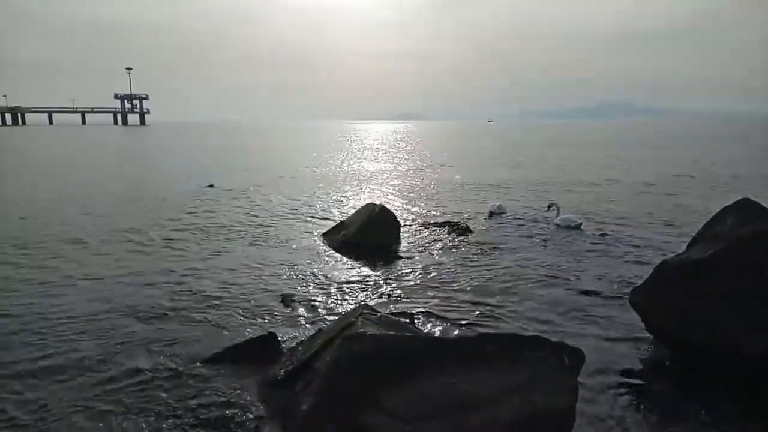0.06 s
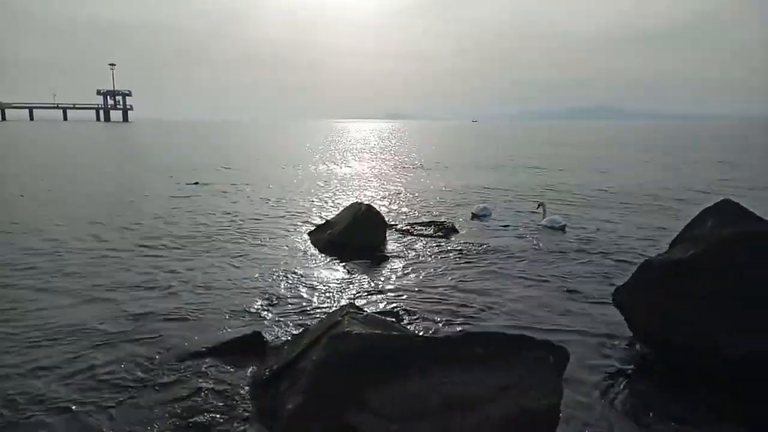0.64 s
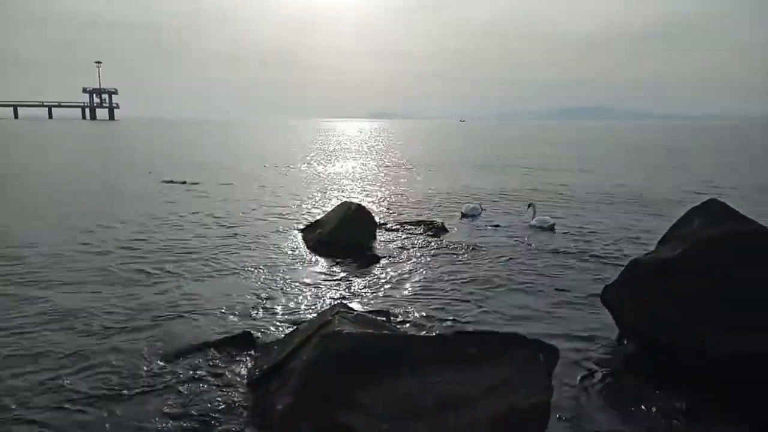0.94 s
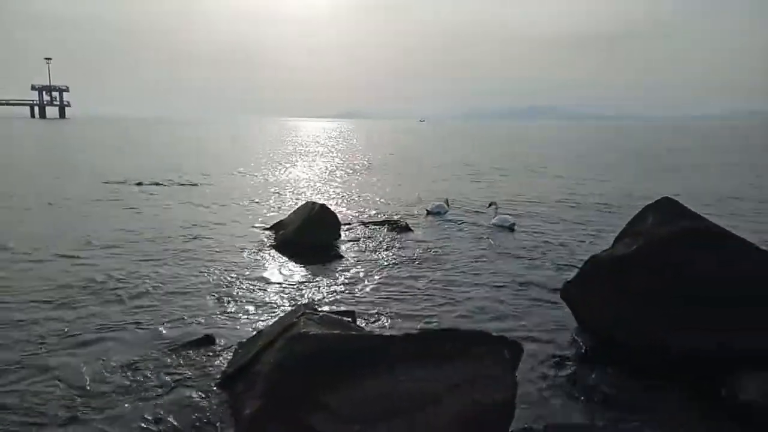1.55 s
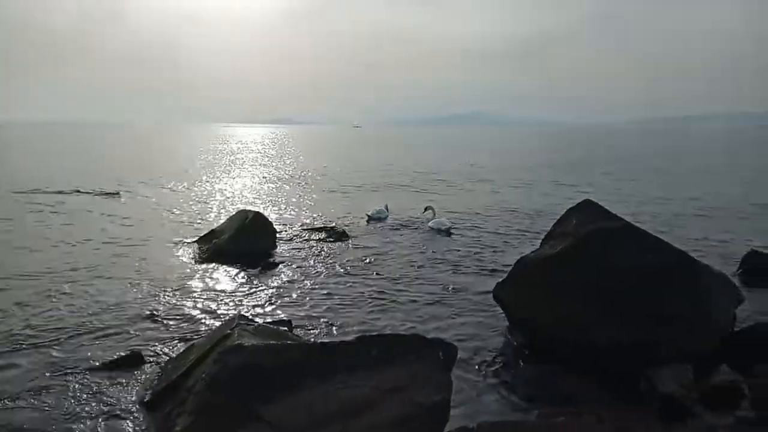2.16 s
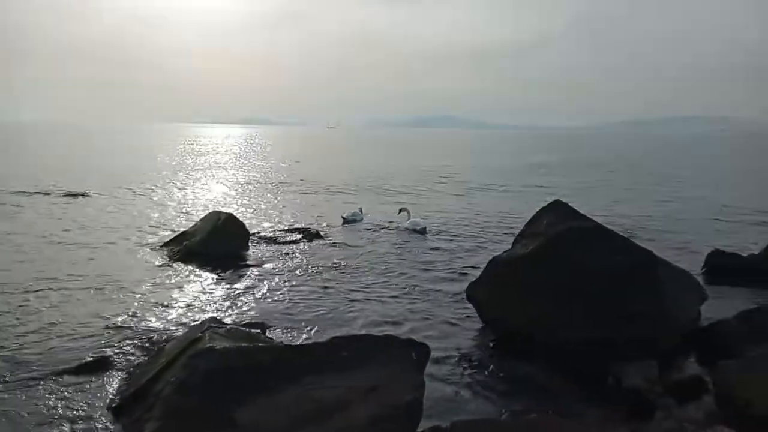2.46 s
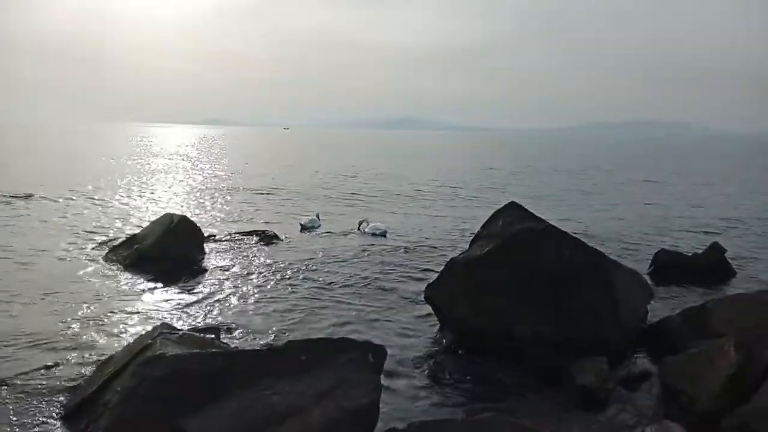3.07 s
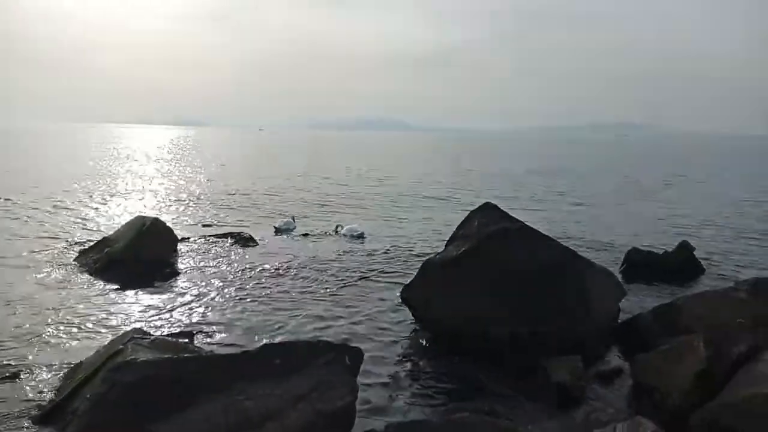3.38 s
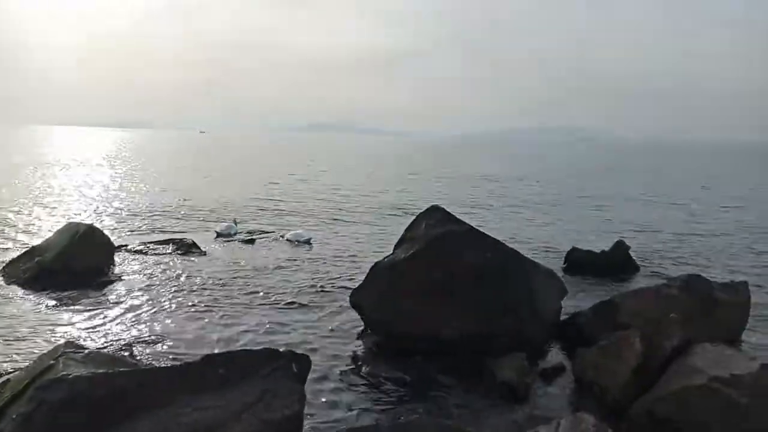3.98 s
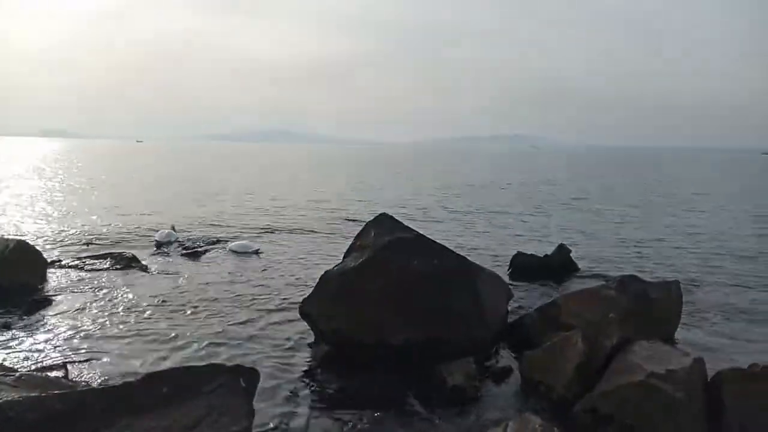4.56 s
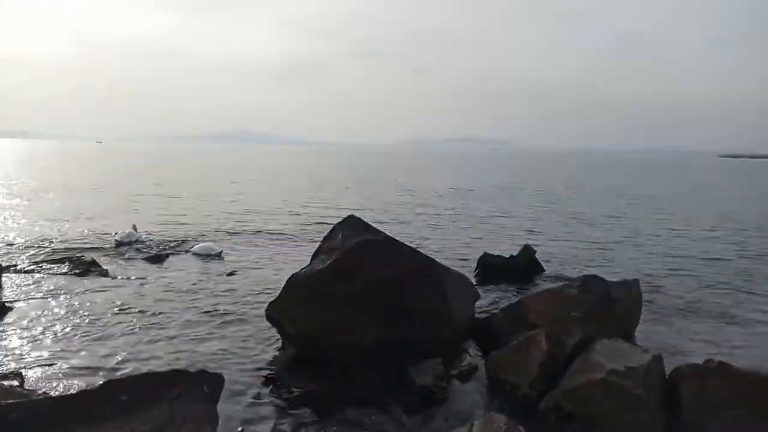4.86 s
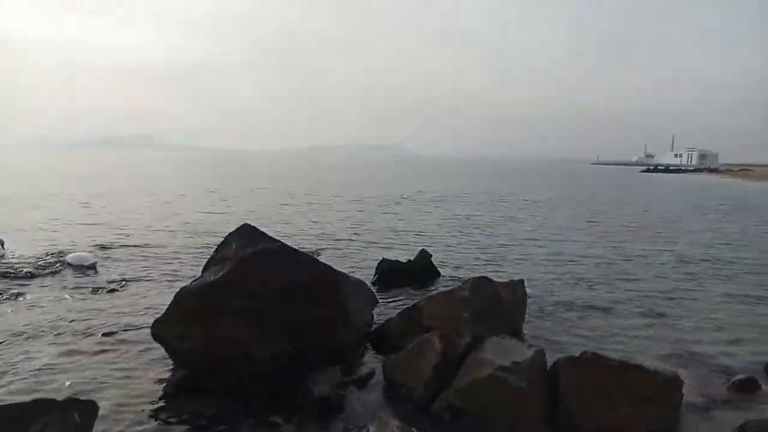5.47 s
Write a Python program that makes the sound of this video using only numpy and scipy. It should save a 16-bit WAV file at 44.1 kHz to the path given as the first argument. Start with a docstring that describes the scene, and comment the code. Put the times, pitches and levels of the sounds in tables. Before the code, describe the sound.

Gentle waves lap, gurgle and splash among shore rocks while a breeze rumbles on the microphone, easing halfway through.

```python
"""Small waves lap among shore rocks while a breeze buffets the microphone, mostly its right port.
Each wave sloshes, gurgles and fizzes as swarms of bubbles ring. Single air pockets plop, spray ticks,
drops fall, mist patters and a swell roars low in a hollow; the boulders return short echoes.
The wind's eddies rumble and flutter, easing halfway through, over a faint hiss.
The left port faces away from the water and hears it late and muffled."""
import sys
import numpy as np
from scipy import signal
from scipy.fft import rfft, irfft, next_fast_len
from scipy.io import wavfile
from scipy.ndimage import uniform_filter1d, map_coordinates

SR = 44100
rng = np.random.default_rng(int(sys.argv[2]) if len(sys.argv) > 2 else 0)


def materialize(psi):
    """Save the field psi as 16-bit PCM at rate SR to the path in sys.argv[1].

    A 1-D psi becomes a single channel; in a 2-D psi each row is a channel.
    """
    bounded = np.clip(np.atleast_2d(psi).T, -1, 1)
    quanta = np.round(bounded * 32767).astype(np.int16)
    wavfile.write(sys.argv[1], SR, quanta)


N = 248283

# Waves reaching the rocks. Each row: crest in seconds, gurgle level in dB, rise and fall in seconds
# per 20 dB, slosh and foam in dB against the gurgle.
LAPS = [(0.01, -45.5, 0.22, .25, -13, -10.5), (0.12, -53, 0.3, .3, 1.5, -0.5),
        (0.48, -51.5, 1, 0.66, -2, -4.5), (0.68, -55, 0.56, 0.28, 3, -1), (1.43, -49.5, 0.71, 0.37, -7, -7),
        (1.66, -49.5, 0.33, 0.21, -5, -4), (2.02, -47, 0.75, .27, -12.5, -3.5),
        (2.17, -57, 0.25, 0.12, 2, -1), (2.72, -58, 0.85, 1, -7, -7.5), (3.33, -55, 0.61, 0.97, 2.5, -4),
        (3.64, -50.5, .45, 0.52, -1, -4), (3.87, -58, 0.12, 0.46, -4, 1.5),
        (4.24, -50, 0.17, 0.57, -12, -3), (4.56, -49.5, 0.78, 0.67, -24, -3.5), (4.85, -44, 1, 1, -12, -5),
        (5.24, -55.5, 0.17, 0.7, -7, -2), (5.58, -44.5, 0.77, 0.63, -8, -3.5)]
def lapping():
    """Level curves of the slosh, gurgle and foam that the waves stir up."""
    crest_s, db, rise_s, fall_s, slosh_offset_db, foam_offset_db = np.transpose(LAPS)
    foam_lag_s = 0.004
    slosh_db = swells(crest_s, db + slosh_offset_db, rise_s, fall_s, calm_db=-61)
    gurgle_db = swells(crest_s, db, rise_s, fall_s, calm_db=-57.5)
    foam_db = swells(crest_s + foam_lag_s, db + foam_offset_db, rise_s, fall_s, calm_db=-80)
    return slosh_db, gurgle_db, foam_db


# Spectra of the three water layers. Each row: frequency in Hz, gain in dB.
SLOSH_EQ = [(120, -23), (300, -3), (450, -6), (750, -4), (1050, -7), (1500, -12.5), (3000, -47)]
GURGLE_EQ = [(500, -48), (900, -6), (1400, -3), (1900, 2), (2600, 1.5), (3100, -5.5), (4100, -55),
             (9000, -60)]
FOAM_EQ = [(1500, -40), (2700, -2), (3800, 2.5), (5200, 1), (6300, -2.5), (7100, -4.5), (10000, -4.5),
           (16000, -10)]
def waves(slosh_db, gurgle_db, foam_db):
    """Each wave sloshes between the rocks, gurgles with trapped air and leaves fizzing foam."""
    big = swarm(per_s=260, low_hz=323.3, high_hz=1205, cycles=15.2, spread_db=1.0, samples=2000)
    medium = swarm(per_s=1100, low_hz=966, high_hz=3224, cycles=44.5, spread_db=2.5, samples=1100)
    tiny = swarm(per_s=2400, low_hz=2996, high_hz=8720, cycles=65, spread_db=4.0, samples=500)
    slosh = amp(slosh_db + 7) * churn(big, SLOSH_EQ, rush_db=8.0, restless_db=2)
    gurgle = amp(gurgle_db + 3.5) * churn(medium, GURGLE_EQ, rush_db=7, restless_db=1.7)
    foam = amp(foam_db + 1.5) * churn(tiny, FOAM_EQ, rush_db=2.0, restless_db=1.43)
    return slosh + gurgle + foam


def swarm(per_s, low_hz, high_hz, cycles, spread_db, samples):
    """Many bubbles at random moments, mostly faint and a few loud, at rms 1."""
    when, pitch, life, strength = rng.random((int(per_s * N / SR), 4)).T[..., None]
    hz = low_hz * (high_hz / low_hz) ** pitch
    rings = bubble(np.arange(samples) / SR, hz, t60_s=cycles * (.5 + life) / hz, rise=0.19)
    rings = rings * amp(-spread_db * np.log(np.maximum(strength, .015)))
    index = (when * N).astype(int) + np.arange(samples)
    return unit(np.bincount(index.ravel(), rings.ravel(), N)[:N])


def bubble(t, hz, t60_s, rise):
    """A pinched-off bubble swells within a cycle, rings down and rises in pitch near the surface."""
    phase = 2 * np.pi * hz * t * (1 + rise * t / t60_s / 2)
    attack = 1 - np.exp(-t * hz)
    return np.sin(phase) * attack * amp(-60 * t / t60_s)


def churn(bubbles, eq, rush_db, restless_db):
    """Near bubbles over the rush of countless far ones, surging unevenly, at rms 1."""
    surging = amp(restless_db * (wobble(24) + wobble(130)))
    water = (bubbles + amp(rush_db) * rng.standard_normal(N)) * surging
    return unit(filtered(water, lambda hz: gain(eq, hz) * port(hz)))


# Single bubbles. Each row: start in seconds, level in dB, pitch in Hz.
PLOPS = [(0.193, -22, 1310), (0.197, -13.5, 2290), (0.39, -23.5, 1850), (1.119, -27.5, 1340),
         (1.142, -24, 2120), (1.282, -28, 2090), (1.428, -29.5, 1430), (1.650, -25.5, 1560),
         (1.674, -24, 1640), (1.851, -29.5, 1470), (1.874, -24.5, 3380), (1.899, -26, 985),
         (2.114, -26.5, 2140), (2.502, -36, 5550), (2.61, -33.5, 2540), (2.667, -27, 2380),
         (2.682, -40, 3640), (2.692, -27, 2340), (2.709, -27, 964), (2.763, -28.5, 1730),
         (3.271, -29, 4200), (3.635, -20.5, 5860), (3.781, -27, 1490), (4.100, -28.5, 1450),
         (4.240, -26, 538), (4.33, -26, 2547), (4.520, -19, 2410), (4.531, -22.5, 1650),
         (4.539, -22.5, 2260), (4.985, -22.5, 5750), (5.344, -28.5, 3070)]
def plops():
    """Pockets of air ring close under the lapping water; smaller, higher ones die sooner."""
    track, t = np.zeros(N), np.arange(SR // 8) / SR
    for start_s, db, hz in PLOPS:
        t60_s = 0.024 * (980 / hz) ** 0.67
        add(track, start_s, amp(db) * bubble(t, hz, t60_s, rise=0.18))
    return track


# Splats. Each row: start in seconds, level in dB, band centre in Hz, seconds to fall 40 dB.
SPLATS = [(0.189, -26.5, 5270, 0.029), (0.386, -25, 3830, 0.034), (0.497, -31.5, 3940, 0.095),
          (1.136, -24, 4840, 0.056), (1.144, -18, 5400, 0.036), (1.393, -35, 700, 0.12),
          (1.422, -35, 4930, 0.02), (1.65, -27, 1780, 0.033), (1.667, -24, 4080, 0.0073),
          (1.872, -26, 6540, 0.016), (2.004, -29.5, 5260, 0.027), (2.112, -28.5, 4800, .015),
          (2.762, -34.5, 6000, .006), (2.8415, -20, 10100, 0.0044), (2.843, -28.5, 5000, 0.034),
          (2.905, -30.5, 2670, 0.011), (3.271, -32.5, 7000, 0.008), (3.536, -30.5, 2460, 0.059),
          (3.633, -26.5, 5000, 0.015), (3.998, -24, 9600, 0.0047), (4.102, -40, 1690, .06),
          (4.218, -28, 556, 0.073), (4.384, -24, 7000, 0.015), (4.982, -28.5, 6170, 0.012),
          (5.552, -27, 5800, 0.015)]
def spray():
    """Water slaps on rock; each splat is a quickly fading burst of tiny impacts."""
    track, t = np.zeros(N), np.arange(SR // 5) / SR
    for start_s, db, centre_hz, length_s in SPLATS:
        impacts = rng.standard_normal(len(t)) * amp(7.9 * rng.standard_normal(len(t)))
        attack = 1 - np.exp(-t / (0.037 * length_s))
        burst = impacts * attack * amp(-40 * t / length_s)
        splat = filtered(burst, lambda hz: port(hz) / (1 + 2.5 * np.log2((hz + 1) / centre_hz) ** 2))
        add(track, start_s, amp(db) * splat / np.abs(splat).max())
    return track


FULL_FOAM_DB = -45.5
def drips(foam_db):
    """Sparse drops fall from the wet rocks, weaker as the rocks drain between waves."""
    high = swarm(per_s=63, low_hz=3380, high_hz=6370, cycles=49, spread_db=6.0, samples=900)
    low = swarm(per_s=35, low_hz=1166, high_hz=2790, cycles=66, spread_db=3.0, samples=1800)
    wetness = amp(0.41 * (foam_db - FULL_FOAM_DB))
    return wetness * (amp(-59) * high + amp(-55) * low)


# Droplet spectrum. Each row: frequency in Hz, gain in dB.
MIST_EQ = [(4000, -37), (6500, -25), (8500, -5), (10500, 3.5), (13800, -6.5), (16000, 2.5)]
def mist(foam_db):
    """The finest droplets, thrown up by the foam, patter back onto the water."""
    drops = swarm(per_s=450, low_hz=5170, high_hz=15700, cycles=46, spread_db=1.0, samples=200)
    fade_db_per_s = 0.87  # the microphone turns away from the misty spot
    level_db = -54.5 + 0.23 * (foam_db - FULL_FOAM_DB) - fade_db_per_s * np.arange(N) / SR
    return amp(level_db) * churn(drops, MIST_EQ, rush_db=-1.5, restless_db=3.5)


# Swells in the hollow. Each row: crest in seconds, level in dB, rise and fall in seconds per 20 dB.
SURGES = [(3.38, -62, 0.55, .8), (3.7, -51.5, 0.41, 0.97), (4.23, -44.5, 0.14, 0.074)]
# The hollow's colour. Each row: frequency in Hz, gain in dB.
HOLLOW_EQ = [(150, -43), (380, 8), (540, -2), (900, -14), (2500, -60)]
def surge():
    """A longer swell pours into a hollow between the boulders with a low roar."""
    level_db = swells(*np.transpose(SURGES), calm_db=-80)
    return amp(level_db) * churn(np.zeros(N), HOLLOW_EQ, rush_db=0, restless_db=-1.0)


def rock_echoes(x, t60_s):
    """Short scattered echoes from the boulders; the paths change as the water moves."""
    echoes, t = np.zeros(N), np.arange(SR // 6) / SR
    path = np.arange(N) / SR / .4  # a new echo pattern every 0.4 s
    for k in range(int(path[-1]) + 2):
        tail = rng.standard_normal(len(t)) * amp(-60 * t / t60_s) * (1 - np.exp(-t / 0.0018))
        crossfade = np.sqrt(np.maximum(1 - np.abs(path - k), 0))
        echoes += signal.oaconvolve(x * crossfade, tail / np.linalg.norm(tail))[:N]
    return echoes


# Breeze strength. Each row: time in seconds, level in dB.
BREEZE = [(0.0, -21.5), (0.6, -22), (1.1, -21.5), (1.52, -23), (1.61, -26.5), (1.7, -22.5), (1.92, -23),
          (1.97, -34), (2.0, -20.5), (2.65, -25), (2.75, -32), (3.25, -31), (3.55, -34), (4.4, -35),
          (4.84, -32), (4.92, -25), (5.2, -31), (5.63, -30)]
# Short puffs on top of it. Each row: crest in seconds, level in dB.
PUFFS = [(2.83, -24.5), (2.941, -23), (3.13, -27), (3.46, -33.5), (3.641, -29.5), (3.92, -28.5),
         (4.11, -26.5), (4.52, -35), (5.3, -32), (5.55, -30)]
# The wind evens out as the microphone turns. Each row: time in seconds, left minus right in dB.
WIND_BALANCE = [(0.0, -13), (2.2, -13), (4.4, -4.5), (5.63, -5.5)]
FULL_GUST_DB, FLUTTER_DB_PER_DB = -22.5, 2.34
def wind():
    """The breeze buffets each port separately; flutter grows faster than rumble in a gust."""
    crest_s, puff_db = np.transpose(PUFFS)
    rumble_db = swells(crest_s, puff_db, rise_s=0.096, fall_s=0.069, calm_db=curve(BREEZE))
    flutter_db = -29.5 + FLUTTER_DB_PER_DB * (rumble_db - FULL_GUST_DB)
    lean = amp(curve(WIND_BALANCE))
    ports = []
    for share, flutter_trim_db in ((lean, -7), (1, -1)):  # left, right
        rumble, flutter = eddies()
        buffet = amp(rumble_db) * rumble + amp(flutter_db + flutter_trim_db) * flutter
        ports.append(2 * share / np.hypot(1, lean) * buffet)
    return overload(np.array(ports), ceiling=0.61, cutoff_hz=900)


# Wind spectra. Each row: frequency in Hz, gain in dB.
RUMBLE_EQ = [(10, -5.5), (25, -16.5), (45, -12.5), (65, -1), (95, 2), (150, -3), (210, -11), (300, -19),
             (500, -51), (1000, -78)]
FLUTTER_EQ = [(90, -47), (170, 3), (240, -2.5), (330, -6), (450, -14), (620, -23), (1000, -57), (3000, -75)]
BURST_DEPTH_DB, BURSTS_PER_S = 2, 35
def eddies():
    """Eddies rumble on one port; each deep suction ends in a sharp rebound, heard as flutter."""
    rumble = unit(filtered(rng.standard_normal(N), lambda hz: gain(RUMBLE_EQ, hz)))
    # a steady breeze's pressure swings stay much alike in size
    power = np.abs(uniform_filter1d(rumble ** 2, size=1500))
    rumble = unit(rumble / (power + 0.036) ** 0.29)
    troughs = signal.argrelmin(rumble)[0]
    suction = np.zeros(N)
    suction[troughs] = -np.clip(-rumble[troughs] - 1, 0, .5) * (.5 + rng.random(N)[troughs])
    turbulence = unit(suction) + amp(-5) * rng.standard_normal(N)
    bursts = amp(BURST_DEPTH_DB * wobble(BURSTS_PER_S))
    # the 90-degree shift turns each pulse into a dip and a rebound
    flutter = unit(filtered(turbulence * bursts, lambda hz: 1j * gain(FLUTTER_EQ, hz)))
    return rumble, flutter


def overload(x, ceiling, cutoff_hz):
    """The ports cannot follow the hardest gusts: peaks round off, and the rumble stays dull."""
    rounded = x / (1 + (x / ceiling) ** 4) ** .25
    return filtered(rounded, lambda hz: 1 / (1 + (hz / cutoff_hz) ** 6))


# Self-noise spectrum. Each row: frequency in Hz, gain in dB.
HISS_EQ = [(500, -8), (5500, 5.5), (8000, 1), (10000, -3.5), (13500, 2), (16000, -18)]
def hiss():
    """Faint steady microphone hiss, stronger on the right."""
    noise = unit(filtered(rng.standard_normal((2, N)), lambda hz: gain(HISS_EQ, hz) * port(hz)))
    return noise * amp([[-78], [-61]])


# Resonances of the open port. Each row: centre in Hz, width in Hz, boost in dB.
PORT_MODES = [(2390, 250, 5), (6000, 450, 4), (10100, 1100, 4), (15250, 560, 12)]
def port(hz):
    """The colour that the microphone's duct gives to sound."""
    return amp(sum(db * np.exp(-((hz - centre) / width) ** 2) for centre, width, db in PORT_MODES))


def swells(crest_s, db, rise_s, fall_s, calm_db):
    """Level in dB of overlapping swells over a calm floor; rise_s and fall_s each span 20 dB."""
    t = np.arange(N)[:, None] / SR - crest_s
    each_db = db - 20 * np.maximum(-t / rise_s, t / fall_s)
    return 10 * np.log10(np.sum(amp(each_db) ** 2, axis=1) + amp(calm_db) ** 2)


def amp(db):
    """Decibels to gain."""
    return 10 ** (np.asarray(db) / 20)


def unit(x):
    """x at rms 1."""
    return x / np.sqrt(np.mean(x ** 2) + 1e-20)


def gain(eq, hz):
    """Gain of (Hz, dB) points read on a log axis."""
    knots_hz, db = np.transpose(eq)
    return amp(np.interp(np.log(hz + 1), np.log(knots_hz + 1), db))


def curve(rows):
    """(Seconds, value) points joined into one value per sample."""
    return np.interp(np.arange(N) / SR, *np.transpose(rows))


def wobble(knots_per_s):
    """A smooth random curve."""
    knots = rng.standard_normal(int(N * knots_per_s / SR) + 4)
    return map_coordinates(knots, [np.arange(N) * knots_per_s / SR])


def filtered(x, response):
    """x through a frequency response, given as a function of Hz."""
    n = x.shape[-1]
    padded = next_fast_len(n + n // 10)
    return irfft(rfft(x, padded) * response(np.fft.rfftfreq(padded, 1 / SR)), padded)[..., :n]


def add(track, start_s, sound):
    """Mix a sound into a track."""
    rest = track[max(round(start_s * SR), 0):][:len(sound)]
    rest += sound[:len(rest)]


# Shading of the water at the left port. Each row: frequency in Hz, gain in dB.
SHADE_EQ = [(250, -1), (700, 3), (1000, -1), (1700, -13.5), (2300, -17), (3200, -19), (6000, -24.5),
            (15000, -60)]
LEFT_LAG_S, LEFT_CUTOFF_HZ = 29 / SR, 2800
def scene():
    """The right port faces the near water; the left hears its lows late, plus other shore, muffled."""
    slosh_db, gurgle_db, foam_db = lapping()
    splashes = plops() + spray() + drips(foam_db)
    near = waves(slosh_db, gurgle_db, foam_db) + surge() + mist(foam_db) + splashes
    right = near + amp(-7.5) * rock_echoes(splashes, t60_s=0.08)
    late = filtered(near, lambda hz: np.exp(-2j * np.pi * hz * LEFT_LAG_S)
                    / np.hypot(1, (hz / LEFT_CUTOFF_HZ) ** 6))
    other_shore = waves(slosh_db, gurgle_db, foam_db) + rock_echoes(splashes, t60_s=0.086)
    left = filtered(amp(-9.0) * late + amp(-3.5) * other_shore, lambda hz: gain(SHADE_EQ, hz))
    return amp(4.5) * np.array([left, right]) + wind() + hiss()


BAND_LIMIT_HZ = 15750
def record(dry):
    """Nothing above the band limit passes."""
    return filtered(dry, lambda hz: hz < BAND_LIMIT_HZ)


dry = scene()
out = record(dry)
materialize(out)
```